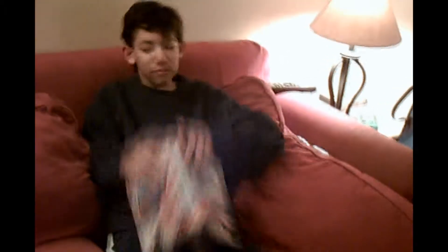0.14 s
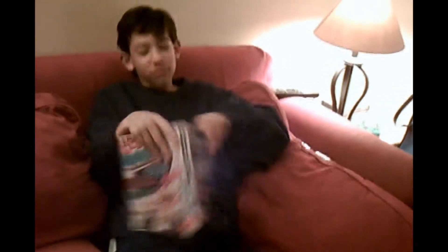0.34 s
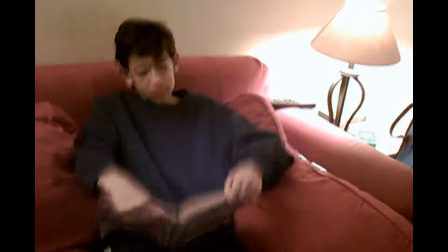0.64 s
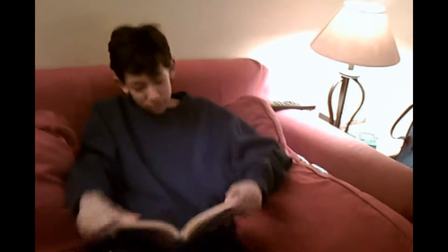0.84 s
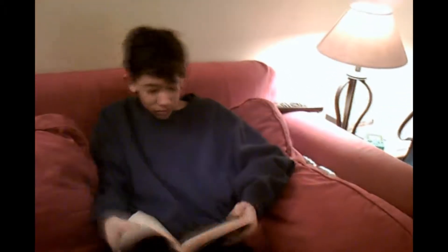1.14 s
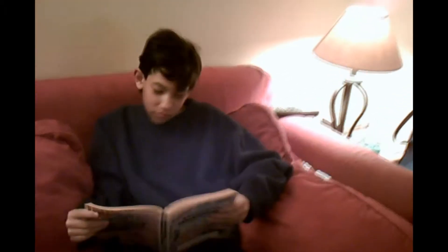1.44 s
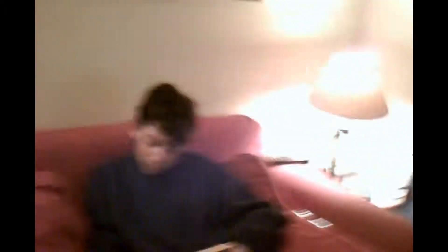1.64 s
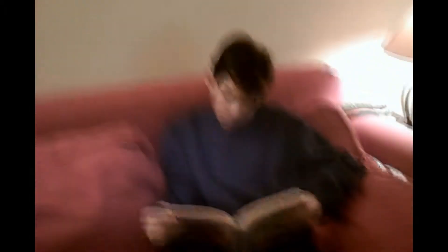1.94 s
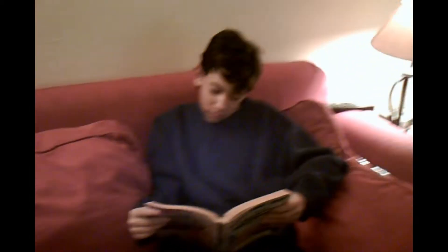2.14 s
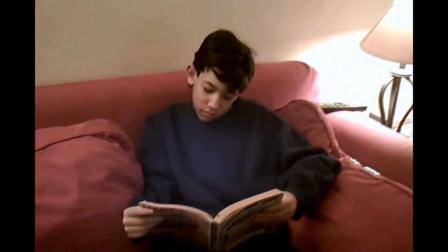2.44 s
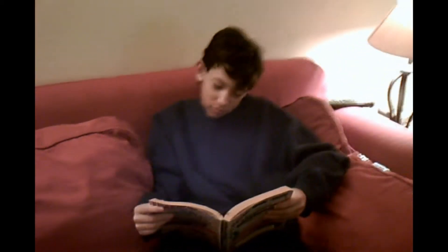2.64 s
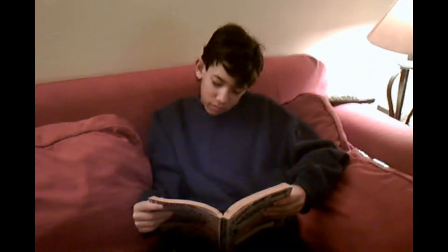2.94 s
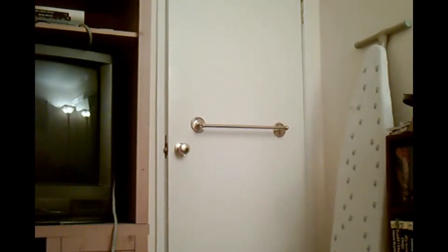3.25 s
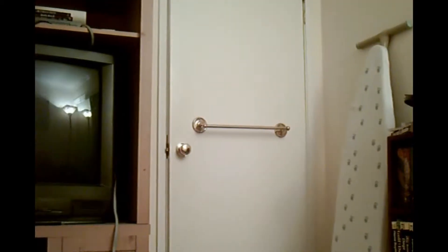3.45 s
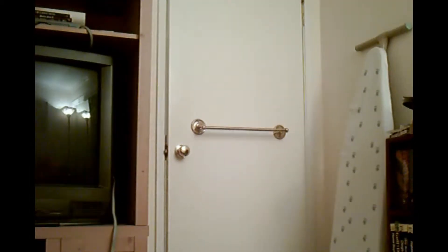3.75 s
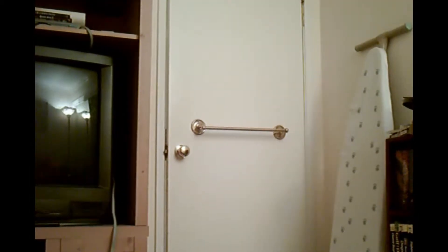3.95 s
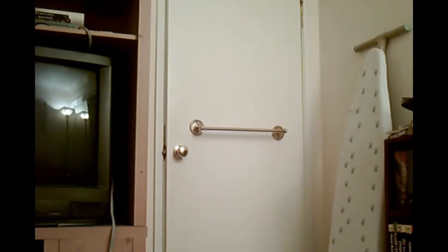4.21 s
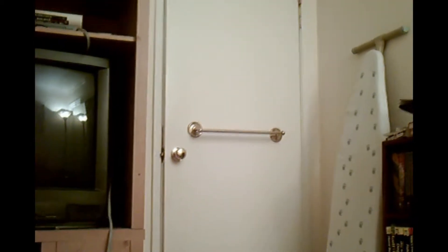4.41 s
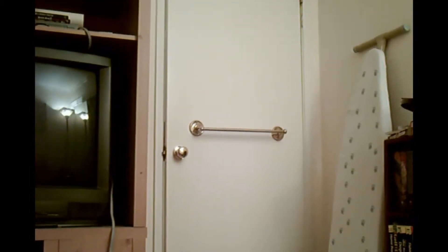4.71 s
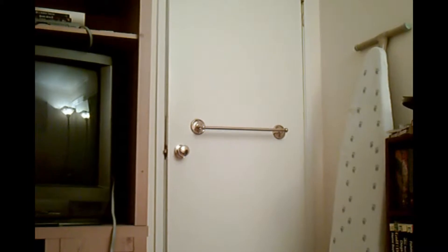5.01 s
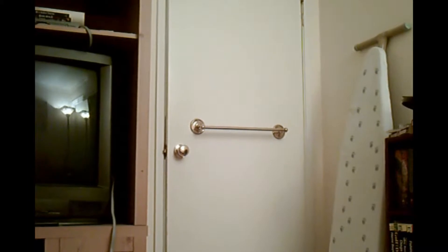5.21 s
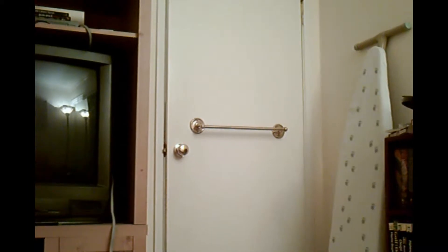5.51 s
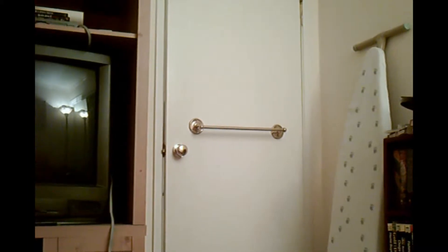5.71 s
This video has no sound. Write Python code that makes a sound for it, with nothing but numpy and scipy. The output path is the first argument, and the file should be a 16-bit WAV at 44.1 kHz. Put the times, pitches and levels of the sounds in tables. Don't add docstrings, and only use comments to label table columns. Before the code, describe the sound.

A dull, low room noise with little hiss runs throughout, heard on a basic handheld microphone indoors. From 0 to 2 s, pages slide and rustle in small uneven strokes, cushions and cloth rub as weight shifts, and a spring creaks very faintly around 0.2 to 0.4 s. At 0.5 s the book flops softly on a lap. A crisp little cluster of paper ticks comes near 2.2 s, then it is nearly still. At 3.13 s there is a small knock and a split-second dropout, then low handling bumps until about 3.5 s. From 3.8 s knuckles rap a hollow wooden door about every 0.16 s, seven raps, dull and moderate, growing firmer to 4.8 s. Four harder blows follow at 5.1, 5.25, 5.57 and 5.76 s, booming and distorted, with the frame shuddering and loose metal fittings jangling, in a short room decay.

```python
import sys
import numpy as np
from scipy import signal
from scipy.fft import rfft, irfft, next_fast_len
from scipy.io import wavfile
from scipy.ndimage import map_coordinates

SR = 44100
rng = np.random.default_rng(int(sys.argv[2]) if len(sys.argv) > 2 else 0)


def makeup_ratio(level_db):
    decades = np.asarray(level_db, float) / 20
    return 10 ** decades


def generate_wav(signal):
    frames = np.transpose(np.atleast_2d(signal))
    scaled = np.clip(frames, -1, 1) * 32767
    pcm = np.round(scaled).astype(np.int16)
    wavfile.write(sys.argv[1], SR, pcm)


N = 258867

# (frequency [Hz], density [dB per Hz])
AIR_SPECTRUM = [(8.8, -48), (15, -0.5), (148, -3), (223, -2), (254, -3), (312, -4.5), (373, -12.5),
                (458, -7.5), (521, -12.5), (624, -13), (786, -14.5), (1570, -19.5), (1740, -22),
                (4180, -26.5), (6990, -45), (9090, -69.5), (15400, -120)]
FLOOR_DB, FLOOR_AFTER_CHANGE_DB = -45, -45.5
# (start [s], end [s])
SILENCE = (3.142, 3.162)
# (frequency [Hz], t60 [s])
ROOM_DECAY = [(150, 0.25), (700, 0.34), (2000, 0.32), (6000, 0.34)]

# (time [s], level [dB], signed frequency [Hz], t60 [s])
NUDGES = [
    (3.1312, -22, 160, .045),
    (3.163, -31, 20, .15),
    (3.24, -36, 6, .6),
    (3.32, -23, -12.5, .5),
    (3.36, -34, 13, .4),
    (3.4, -29, 13, .3),
    (3.432, -28, -11, .4),
]

# (time [s], peak level
# [dB], ring [Hz], crispness [dB], t60 [s])
SMALL_TICKS = [(0.11, -48, 1400, 2, 0.012), (0.223, -40, 1380, -9, 0.031), (1.967, -42, 587, -23, 0.029),
               (2.13, -33, 2430, -9, 0.0074), (2.1315, -29, 656, -30, 0.016),
               (2.1715, -34.5, 560, -32, 0.023), (2.178, -50.5, 3480, -1, 0.027),
               (2.1863, -20.5, 1470, -14.5, 0.0055), (2.232, -39, 1360, -16, 0.024),
               (4.795, -26.5, 2480, -27.5, 0.019), (4.805, -22, 2100, -29, 0.028),
               (4.884, -49.5, 3520, 4.5, 0.0076), (5.434, -49.5, 3460, -5.5, 0.012)]
# (time [s], level [dB], t60 [s])
CLOTH_BRUSHES = [
    (3.187, -44, .22),
    (.92, -38, .1),
    (1.035, -36, .08),
]
# (time [s], level [dB], t60 [s])
BOOK_FLOPS = [
    (0.498, -25.5, 0.15),
    (.507, -21, 0.26),
    (0.599, -37, 0.31),
]
# (frequency [Hz], density [dB per Hz])
LAP_SPECTRUM = [(120, -49), (200, -15), (447, -2.5), (646, -7), (976, -1), (1060, -3), (1270, -1.5),
                (1410, -11), (2500, -39), (3250, -65), (5500, -120)]

# (start [s], hold [s], strength [dB], crispness [dB])
PAGE_STROKES = [(.04, 1.76, -52.5, -8), (.222, 0.011, -41.5, -9.5), (.26, 0.043, -47, -14),
                (.37, 0.093, -43, -10.5), (.5, 0.019, -41, -16), (.64, 0.022, -41, -12.5),
                (.725, .01, -50, -24), (.925, 0.067, -44.5, -17), (1.05, .04, -45, -12),
                (1.1, .03, -40, -11), (1.15, 0.11, -54, -2.5), (1.35, 0.053, -39, -15.5),
                (1.43, 0.056, -46.5, -11), (1.56, 0.09, -49.5, -21), (1.67, 0.026, -43, -19),
                (1.715, .05, -41.5, -6), (1.78, 0.012, -49, -6)]
STROKE_RISE, STROKE_FALL = 370, 180
# (start [s], hold [s], strength [dB], upholstery over cushion [dB])
WEIGHT_SHIFTS = [(.05, .4, -50.5, 0.5), (.46, .01, -39, -5), (.505, .01, -46, 12.5), (.6, .03, -49, 6),
                 (.72, 0.0075, -52, 13), (.92, .02, -51, 2), (1.075, 0.026, -53.5, 10), (1.38, .04, -58, 8),
                 (1.53, 0.036, -47, -4), (1.575, 0.0088, -65.5, 20), (1.65, 0.024, -55, 8),
                 (1.96, .01, -49, -1)]
SHIFT_RISE, SHIFT_FALL = 780, 176
STILL_S = 2.04
# (frequency [Hz], density [dB per Hz])
CUSHION_SPECTRUM = [(15, -3), (40, -4), (110, 4), (200, -10), (350, -57)]
# (frequency [Hz], density [dB per Hz])
UPHOLSTERY_SPECTRUM = [(120, -1), (250, 7.5), (450, 12), (700, 4.5), (1100, -41), (2500, -63)]
# (frequency [Hz], density [dB per Hz])
SHEET_SPECTRUM = [(450, -14), (750, -1), (1150, 3), (1500, -0.5), (2200, -11), (3000, -36), (7000, -39.5),
                  (9000, -61)]
# (frequency [Hz], density [dB per Hz])
CRISP_SPECTRUM = [(1410, -32), (2400, -4.5), (3120, -11), (3240, -6), (3510, -5.5), (4120, 0.5),
                  (4470, -6.5), (4840, -8), (5470, -20), (6990, -21), (9090, -60), (15400, -120)]
# (time [s], frequency [Hz], level [dB])
SPRING = [
    (.12, 528, -61),
    (.2, 533, -48),
    (.4, 537, -52),
    (.47, 527, -80),
]

# (time [s], peak level [dB])
RATTLE_EVENTS = [(4.798, -34.5), (5.1062, -26.5), (5.1537, -17.5), (5.258, -24.5), (5.275, -24.5),
                 (5.305, -27), (5.5739, -17), (5.59, -20), (5.606, -11), (5.6371, -20.5), (5.7754, -16),
                 (5.7974, -32)]
# (frequency [Hz], level [dB], t60 [s])
METAL_MODES = [(3800, -8, .15), (3876, -3, .2), (3924, 2, .22), (4000, 1, .2), (4090, -4, .15),
               (5039, -15, .25), (5211, -14, .25), (5437, -14, .25), (5700, -15, .2), (5986, -16, .2),
               (7106, -16, .18)]
# (frequency [Hz], density [dB per Hz])
JANGLE_SPECTRUM = [(2500, -18.5), (3750, -12), (3970, 7), (4200, -6), (5300, -2), (6000, -11.0), (6500, -36),
                   (7100, -11), (7600, -38.0), (9000, -57.0)]

# (time [s], push [relative])
KNUCKLE_BLOWS = [(3.8108, .68), (3.966, .6), (4.1212, .51), (4.2915, .8), (4.4585, .78), (4.6243, .88),
                 (4.7847, .94), (5.1032, .97), (5.2534, 1.1), (5.5702, 1.16), (5.7564, 1.05)]
# (panel peak level [dB], brightness [dB])
BLOW_FORCE = [(-13, -27), (-12, -28), (-13.5, -28), (-11.5, -24.5), (-11.5, -25), (-9, -23.5), (-6.5, -18),
              (-3.5, -20), (-1, -21), (0.5, -20.5), (-4.5, -22)]
SPOT_CHANGES = (4.2, 5.0)
CONTACT_TIME = [0.0011, 0.00066, 0.00015]
# (delay [s], level [dB])
EDGE_RETURNS = [
    (.0008, -1),
    (.0029, -5),
    (.0042, -1.5),
    (.006, -14.5),
]
# (frequency [Hz], t60 [s], signed swing for knuckle raps, for fist blows)
BOOM_MODES = [(12.4, 0.19, -0.112, -0.17), (20.0, 0.84, -0.168, -0.32), (28.5, 0.2, -0.146, -0.38),
              (34.2, 0.12, 0.423, 0.73), (45.1, 0.51, -0.22, -0.35), (47.5, 0.55, 0.215, 0.49),
              (58.8, 0.28, 0.586, 1.12), (60.5, 0.43, -0.196, -0.16), (62.7, 0.37, -0.204, -0.64),
              (80.2, 0.15, 0.237, 0.67), (90.1, 0.4, -0.058, -0.1), (106.1, 0.5, 0.015, 0.04),
              (126.0, 0.12, 0.238, 0.63), (127.2, 0.25, -0.132, -0.55), (144.8, 0.14, -0.014, -0.36),
              (157.8, 0.33, -0.059, 0.13)]
# (frequency [Hz], t60 [s], level at first spot [dB], second spot [dB], third spot [dB])
PANEL_MODES = [(187.6, 0.15, 5, -7.5, -4), (234, 0.25, -1.5, -16, -0.5), (263.3, 0.25, -2, -5.5, 0.5),
               (287.5, 0.28, -9, -10, -5.5), (340.2, 0.21, 5.5, 4, -7.5), (410.7, 0.28, 0, -12.5, -14.5),
               (472, 0.32, -1.5, -4.5, -14), (520.2, 0.33, -3, -4.5, -9), (573.2, 0.17, 5.5, 4, -1.5),
               (622, 0.14, -18, -19, -3), (716, 0.19, 1.5, -6, -4), (758, 0.25, -5, -2, -6.5),
               (830, 0.097, -12, -25, -2.5), (869, 0.22, -11, -16, -7), (936, 0.19, -13, 2, -3.5),
               (996, 0.19, -12.5, -11, -15), (1005, 0.19, -29.5, -17, -15.5), (1183, 0.15, -30, -12.5, -6),
               (1226, 0.25, -26, -22, -11), (1342, 0.11, -31, -11, -11), (1400, 0.12, -8, 0, -10),
               (1606, 0.14, -25, -10, -9.5)]
# (frequency [Hz], density [dB per Hz])
WOOD_SPECTRUM = [(88, -12), (150, -4), (214, -7), (575, -6), (634, -12), (840, -9.5), (1270, -11),
                 (2000, -22.5), (2600, -62.5), (4400, -120)]
# (frequency [Hz], density [dB per Hz])
SNAP_SPECTRUM = [(1200, 0.5), (1800, 0), (2500, -6.5), (3500, -10), (5500, -17), (7500, -39.5)]
# (frequency [Hz], density [dB per Hz])
FRAME_SPECTRUM = [(60, -40.5), (95, -2.5), (125, -0.5), (160, -0.5), (210, -27.5), (400, -90)]
FRAME_DB = [-28, -28, -13]

TOP_HZ = 8500


def unit(x):
    return x / np.sqrt(np.mean(x ** 2) + 1e-20)


def along(points, hz):
    f, v = np.transpose(points)
    return np.interp(np.log(hz + 1), np.log(f + 1), v)


def curves(rows):
    s, *columns = np.transpose(rows)
    return [np.interp(np.arange(N) / SR, s, column) for column in columns]


def wobble(rate):
    knots = rng.standard_normal(int(N * rate / SR) + 4)
    return map_coordinates(knots, [np.arange(N) * rate / SR])


def noise(size):
    return rng.standard_normal(size)


def coloured(x, spectrum):
    m = next_fast_len(len(x) + 8192)
    gain = makeup_ratio(along(spectrum, np.fft.rfftfreq(m, 1 / SR)))
    return unit(irfft(rfft(x, m) * gain, m)[:len(x)])


def dying(spectrum, size):
    hz, t, z = signal.stft(coloured(noise(size), spectrum), SR, nperseg=256)
    decay = makeup_ratio(-60 * t / along(ROOM_DECAY, hz)[:, None])
    return signal.istft(z * decay, SR, nperseg=256)[1][:size]


def ring(modes, t, spread_db):
    total = 0
    for hz, db, t60 in modes:
        total = total + makeup_ratio(db + rng.normal(0, spread_db) - 60 * t / t60) * np.sin(2 * np.pi * hz * t)
    return total


def add(track, s, sound):
    part = track[round(s * SR):][:len(sound)]
    part += sound[:len(part)]


def gestures(rows, rise, fall):
    t = np.arange(N) / SR
    main_power, second_power = 0, 0
    for s, held, db, over_db in rows:
        envelope = makeup_ratio(db - rise * np.maximum(s - t, 0) - fall * np.maximum(t - s - held, 0))
        main_power = main_power + envelope ** 2
        second_power = second_power + (envelope * makeup_ratio(over_db)) ** 2
    return [np.sqrt(main_power), np.sqrt(second_power)]


def floor():
    db = np.where(np.arange(N) / SR < SILENCE[0], FLOOR_DB, FLOOR_AFTER_CHANGE_DB)
    return makeup_ratio(db + .8 * wobble(5.94)) * coloured(noise(N), AIR_SPECTRUM)


def handling():
    out, t = np.zeros(N), np.arange(SR // 2) / SR
    for s, db, hz, t60 in NUDGES:
        add(out, s, makeup_ratio(db - 60 * t / t60) * np.sin(2 * np.pi * hz * t))
    return out


def ticks():
    out, t = np.zeros(N), np.arange(SR // 4) / SR
    size = len(t)
    for s, db, hz, crisp_db, t60 in SMALL_TICKS:
        body = np.sin(2 * np.pi * hz * t) + 0.42 * coloured(noise(size), SHEET_SPECTRUM)
        crack = makeup_ratio(crisp_db) * coloured(noise(size), CRISP_SPECTRUM)
        onset = 1 - np.exp(-t / .0004)
        add(out, s, makeup_ratio(db + 5.5 - 60 * t / t60) * (body * onset + crack))
    for s, db, t60 in CLOTH_BRUSHES:
        brush = coloured(noise(size), SHEET_SPECTRUM) + 0.17 * coloured(noise(size), CRISP_SPECTRUM)
        add(out, s, makeup_ratio(db - 60 * t / t60) * brush)
    for s, db, t60 in BOOK_FLOPS:
        onset = 1 - np.exp(-t / 0.0018)
        add(out, s, makeup_ratio(db - 60 * t / t60) * onset * coloured(noise(size), LAP_SPECTRUM))
    return out


def pages():
    fade = np.clip((STILL_S - np.arange(N) / SR) * 10, 0, 1)
    gains = gestures(WEIGHT_SHIFTS, SHIFT_RISE, SHIFT_FALL) + gestures(PAGE_STROKES, STROKE_RISE, STROKE_FALL)
    bodies = (CUSHION_SPECTRUM, UPHOLSTERY_SPECTRUM, SHEET_SPECTRUM, CRISP_SPECTRUM)
    rub = 0
    for gain, body in zip(gains, bodies):
        grains = noise(N) * makeup_ratio(2 * wobble(200) + 1.1 * wobble(30))
        rub = rub + gain * coloured(grains, body)
    hz, hum_db = curves(SPRING)
    hum = makeup_ratio(hum_db + 4 + 1.5 * wobble(20)) * np.sin(2 * np.pi * np.cumsum(hz) / SR)
    return fade * (rub + hum)


def fittings():
    out, t = np.zeros(N), np.arange(SR // 4) / SR
    for s, db in RATTLE_EVENTS:
        contacts = noise(len(t)) * (rng.random(len(t)) < 900 / SR) * makeup_ratio(-60 * t / 0.22)
        contacts[0] = 1.6
        detuned = t * rng.normal(1, .003)
        bell = ring(METAL_MODES, detuned, spread_db=4) * makeup_ratio(-60 * t / .1)
        scatter = coloured(noise(len(t)), JANGLE_SPECTRUM) * makeup_ratio(-60 * t / 0.075)
        metal = makeup_ratio(-12) * bell + makeup_ratio(-10.5) * scatter
        add(out, s, makeup_ratio(db - 13.5) * signal.fftconvolve(contacts, metal))
    return out


def edge_pulses(t):
    total = 0
    for delay, db in EDGE_RETURNS:
        u = (t - delay) / 0.00043
        total = total + makeup_ratio(db) * (1 - 2.1 * u * u) * np.exp(-u * u)
    return total


def boom(swing, t):
    total = 0
    for hz, t60, *swings in BOOM_MODES:
        total = total + swings[swing] * makeup_ratio(-60 * t / t60) * np.sin(2 * np.pi * hz * t)
    return total


def door():
    out, long = np.zeros(N), np.arange(SR) / SR
    t = long[:SR // 2]
    size = len(t)
    booms = [boom(swing, long) for swing in (0, 0, 1)]
    woods = [dying(WOOD_SPECTRUM, size) for spot in CONTACT_TIME]
    pulses = edge_pulses(t)
    rise = 1 - np.exp(-t / 0.0019)
    touch = 1 - np.exp(-(t / 0.00026) ** 2)
    build = 1 - np.exp(-t / 0.0026)
    boom_onset = 1 - np.exp(-(long / 0.00043) ** 2)
    shudder_shape = makeup_ratio(-60 * t / .55) * (1 - np.exp(-t / .015))
    for (s, push), (db, bright_db) in zip(KNUCKLE_BLOWS, BLOW_FORCE):
        spot = np.searchsorted(SPOT_CHANGES, s)
        modes = ring([(row[0], row[2 + spot], row[1]) for row in PANEL_MODES], t, spread_db=0.0)
        diffuse = makeup_ratio(-8) * woods[spot] + makeup_ratio(-11.5) * dying(WOOD_SPECTRUM, size)
        panel = pulses * touch + makeup_ratio(-12) * rise * modes + build * diffuse
        force = np.exp(-(np.arange(-60, 61) / SR / CONTACT_TIME[spot] * 4) ** 2)
        struck = np.convolve(panel, force / force.sum(), "same")
        snap = makeup_ratio(bright_db - 3) * dying(SNAP_SPECTRUM, size) * build
        shudder = makeup_ratio(FRAME_DB[spot]) * shudder_shape * coloured(noise(size), FRAME_SPECTRUM)
        add(out, s, makeup_ratio(db) * (struck + snap))
        add(out, s, push * shudder)
        add(out, s, 1.07 * push * booms[spot] * boom_onset)
    return out


def scene():
    return (door() + fittings() + pages() + ticks() + handling() + floor())[None]


def band_limit(x):
    return signal.sosfilt(signal.butter(12, 16000, fs=SR, output="sos"), x)


def record(dry):
    m = next_fast_len(N + 8192)
    low_pass = 1 / (1 + (np.fft.rfftfreq(m, 1 / SR) / TOP_HZ) ** 14)
    x = irfft(rfft(dry, m) * low_pass, m)[:, :N]
    t = np.arange(N) / SR
    gate = np.clip(np.maximum((SILENCE[0] - t) * SR, (t - SILENCE[1]) * 250), 0, 1)
    mix = np.clip(x * gate, -1, 1)
    return band_limit(mix)


dry = scene()
out = record(dry)
generate_wav(out)
```